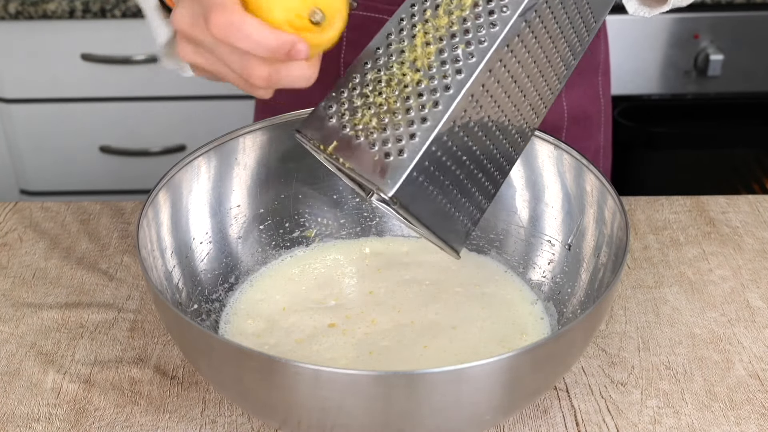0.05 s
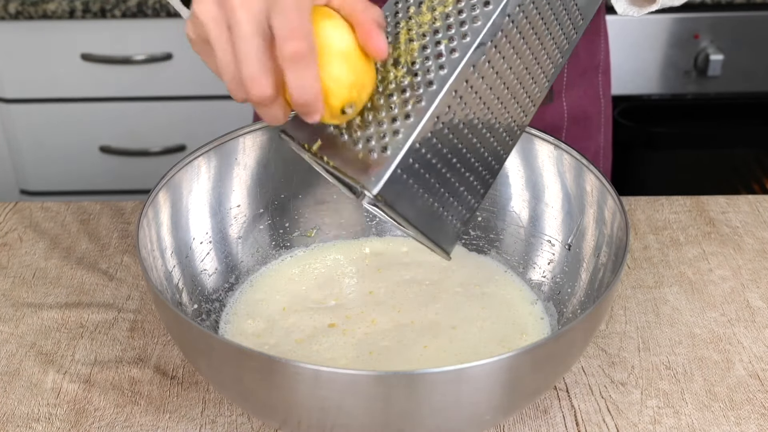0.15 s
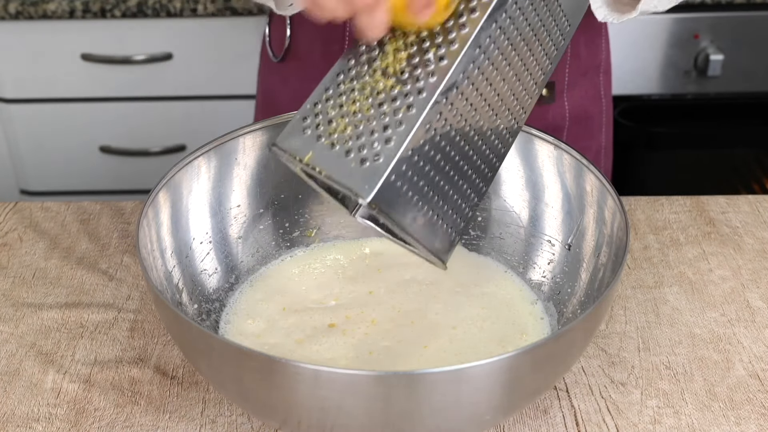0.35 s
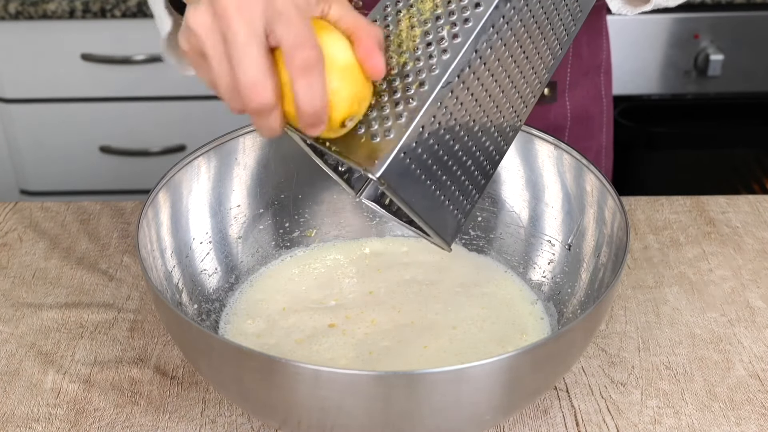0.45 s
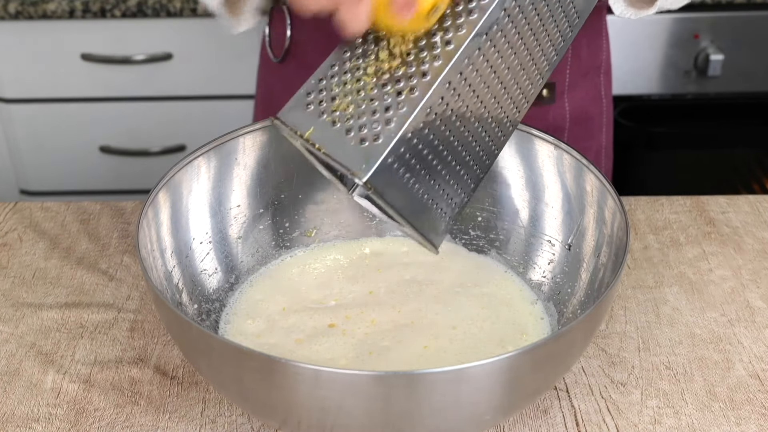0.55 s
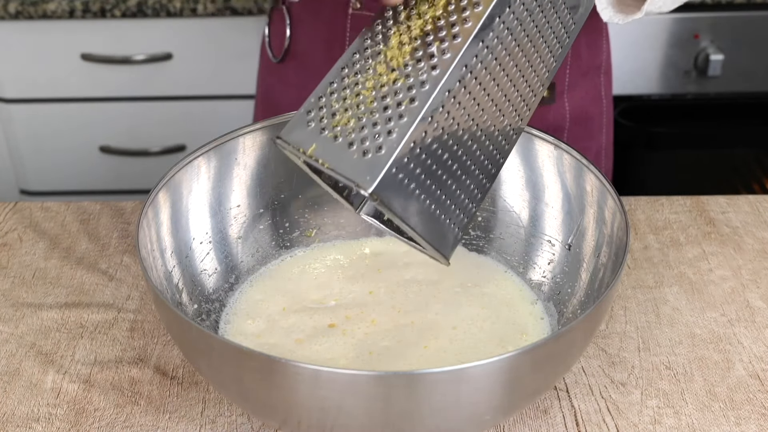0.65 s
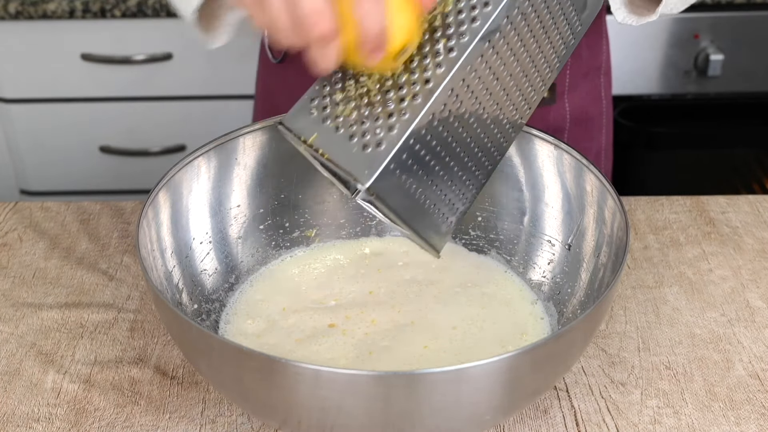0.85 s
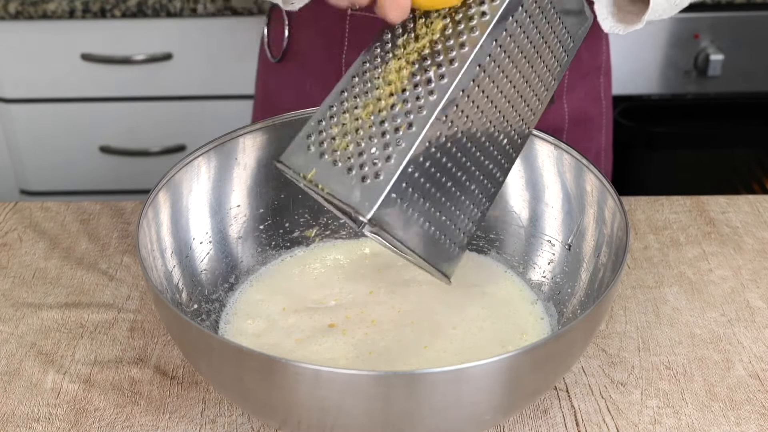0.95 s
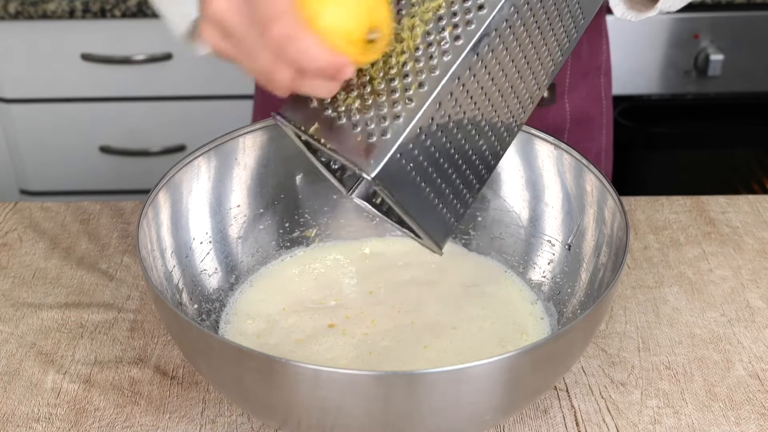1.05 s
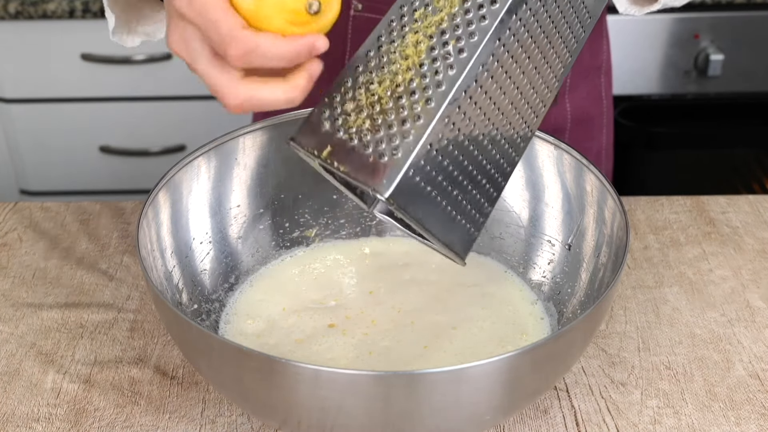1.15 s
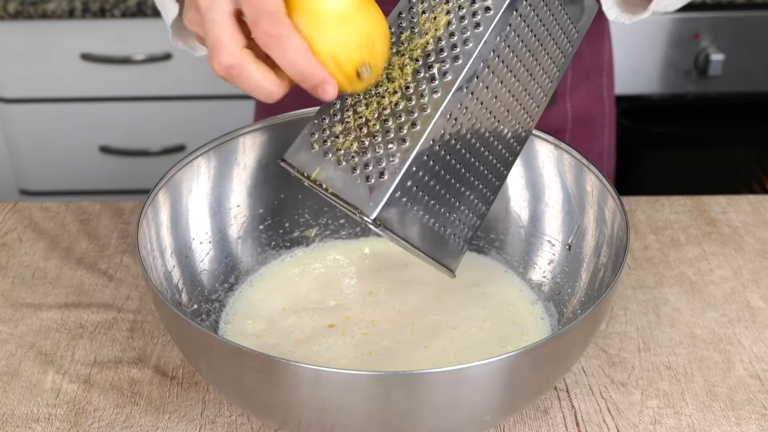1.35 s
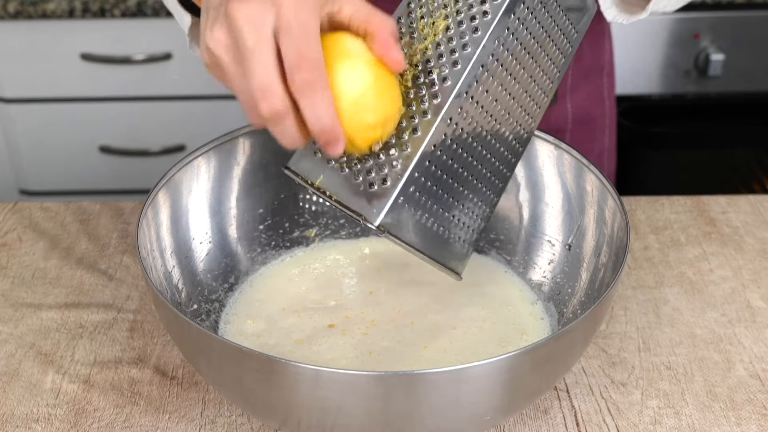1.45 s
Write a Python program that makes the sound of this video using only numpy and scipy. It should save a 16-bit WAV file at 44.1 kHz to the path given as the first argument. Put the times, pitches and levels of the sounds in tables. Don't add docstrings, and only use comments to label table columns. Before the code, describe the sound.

After a brief hush of dull room hum, fruit peel rasps five times in quick succession on a ringing sheet-metal grater, with low table thumps beneath; then soft handling, heard close in a small hard-walled kitchen, left channel only.

```python
import sys
import numpy as np
from scipy import signal
from scipy.fft import rfft, irfft
from scipy.io import wavfile
from scipy.ndimage import uniform_filter1d

SR = 44100
rng = np.random.default_rng(int(sys.argv[2]) if len(sys.argv) > 2 else 0)


def wrap_up_sound(samples):
    columns = np.atleast_2d(samples).T
    tamed = np.clip(columns, -1, 1)
    steps = np.round(tamed * 32767).astype(np.int16)
    wavfile.write(sys.argv[1], SR, steps)


def ratio(d):
    e = np.asarray(d, float) / 20
    return 10 ** e


N = 66150


def evened(x):
    return x / np.sqrt(np.mean(x ** 2) + 1e-20)


def read(points, hz):
    f, value = np.transpose(points)
    return np.interp(np.log(hz + 1), np.log(f + 1), value)


def curve(points):
    return np.interp(np.arange(N) / SR, *np.transpose(points))


def filtered(x, points):
    return irfft(rfft(x) * ratio(read(points, np.fft.rfftfreq(N, 1 / SR))), N)


def coloured(x, points):
    return evened(filtered(x, points))


def wobble(span_s):
    size = max(int(span_s * SR), 2)
    noise = rng.standard_normal(N)
    return evened(uniform_filter1d(uniform_filter1d(noise, size), size))


def patchy(x):
    patch_db = 2.2
    z = signal.stft(x, SR, nperseg=256)[2]
    field = uniform_filter1d(rng.standard_normal(z.shape), size=5, axis=0)
    field = uniform_filter1d(field, size=8, axis=1)
    z = z * ratio(patch_db * evened(field))
    return evened(signal.istft(z, SR, nperseg=256)[1][:N])


def ringing(x, modes, grip_db):
    grip_s = 0.05
    out = np.zeros(N)
    for hz, width, db in modes:
        r = np.exp(-np.pi * width / SR)
        poles = [1, -2 * r * np.cos(2 * np.pi * hz / SR), r * r]
        drive = x * ratio(grip_db * wobble(grip_s))
        out += ratio(db) * (1 - r) * signal.lfilter([1, 0, -1], poles, drive)
    return out


def rubbing():
    # (start [s], fastest [s], end [s], force [dB], extra ring of the open side [dB])
    strokes = [
        (0.23, 0.288, .41, -19.5, -8),
        (0.376, 0.452, 0.54, -17.5, -4),
        (0.525, 0.612, 0.7, -17, -12),
        (0.681, 0.783, 0.8725, -18.5, -1),
        (0.852, 0.907, 1.0393, -16.5, -0.5),
        (1.454, 1.465, 1.52, -33.5, 14),
    ]
    # (start [s], level [dB], rub length [s], fade [dB/s], extra weight on the bowl [dB])
    touches = [
        (0.207, -36.5, 0.055, 282, -27),
        (0.269, -24.5, 0.0042, 488, -14),
        (1.017, -34, 0.012, 168.5, 3),
        (1.1, -30.5, 0.01, 529, 11),
    ]
    rise_power, fall_power, touch_rise_s = 0.99, 1.445, 0.0059
    t = np.arange(N) / SR
    out = np.zeros((3, N))
    for start, top, end, db, free_db in strokes:
        up = np.clip((t - start) / (top - start), 0, 1)
        down = np.clip((end - t) / (end - top), 0, 1)
        arch = np.sin(np.pi / 2 * up) ** rise_power * np.sin(np.pi / 2 * down) ** fall_power
        out += ratio(db + np.array([[0], [0], [free_db]])) * arch
    for start, db, length, fade_db_per_s, weight_db in touches:
        rise = np.clip((t - start) / touch_rise_s, 0, 1)
        fade = ratio(-fade_db_per_s * np.maximum(t - start - length, 0))
        out += ratio(db + np.array([[0], [weight_db], [0]])) * rise * fade
    return out


def tearing():
    tears_per_s, spread_db = 9000, 1
    flicker_db, flicker_s = 0.5, 0.0022
    size = ratio(spread_db * np.minimum(rng.exponential(1, N), 4)) * rng.choice([-1., 1.], N)
    tears = evened(size * (rng.random(N) < tears_per_s / SR))
    return patchy(tears * ratio(flicker_db * wobble(flicker_s)))


def grater():
    # (frequency [Hz], density [dB per Hz])
    peel_colour = [(120, -31.5), (200, -36.5), (392, 5), (437, -14), (755, -12), (1380, -6.5), (4020, -4),
                   (8320, -1.5), (15400, -12.5)]
    # (frequency [Hz], width [Hz], level [dB])
    panels = [(1290, 320, 3.5), (1697, 83, 4.5), (2042, 86, -4), (2576, 110, 7.5), (2875, 95, 5),
              (3780, 89, -14)]
    # (frequency [Hz], width [Hz], level [dB])
    rims = [(4975, 300, 4), (6060, 40, -0.5), (6010, 220, 0), (6380, 440, -6.5), (9000, 45, -2),
            (8430, 170, 0.5), (9750, 25, 4)]
    # (frequency [Hz], width [Hz], level [dB])
    rings = [(1315, 9.9, 4), (1903, 41, 3), (1991, 28, -5), (2143, 38, 3), (2280, 11, -5),
             (2797, 6.7, -8.5), (2820, 4.7, -1), (2850, 12, -7), (2940, 12, 4), (5605, 35, 2.5)]
    # (frequency [Hz], width [Hz], level [dB])
    long_rings = [(1063, 6, 0), (1105, 9, -5), (1405, 7, -3), (1508, 10, -5)]
    # (frequency [Hz], width [Hz], level [dB])
    bowl = [(314.6, 37, -2.5), (405, 17, -1), (497, 32, 1), (656.8, 16, 6), (910, 85, -16)]
    peel_db, grip_db = -2, 2.5
    sizzle_hz, sizzle_power = 11000, 0.5
    force, weight, free = rubbing()
    tears = tearing()
    peel = coloured(tears, peel_colour)
    top = signal.filtfilt(*signal.butter(2, sizzle_hz, "high", fs=SR), peel)
    lost = 1 - (force / force.max()) ** sizzle_power
    out = ratio(peel_db) * force * (peel - lost * top)
    for modes, db, drive in ((panels, -13, force), (rims, -17, force), (rings, -12, force),
                             (long_rings, -16, free), (bowl, -17, weight)):
        scale = np.sqrt(sum(ratio(2 * level) * width for hz, width, level in modes) * np.pi / SR)
        out += ratio(db) * ringing(tears * drive, modes, grip_db) / scale
    return out


def tick():
    # (frequency [Hz], width [Hz], level [dB])
    struck = [(2300, 200, 0.52), (2630, 150, 1.5), (3180, 130, 0.23)]
    start_s, level_db, fade_db_per_s = 0.204, -33, 450
    t = np.arange(N) / SR - start_s
    burst = (t > 0) * ratio(-fade_db_per_s * np.maximum(t, 0)) * rng.standard_normal(N)
    ring = ringing(burst, struck, grip_db=0)
    return ratio(level_db) * ring / abs(ring).max()


def table():
    # (time [s], level [dB])
    shake = [(0.25, -62.5), (0.494, -33.5), (0.626, -38), (0.702, -74), (0.75, -53), (0.86, -64.5),
             (0.896, -48.5), (1.026, -71.5), (1.06, -86.5)]
    # (frequency [Hz], density [dB per Hz])
    shake_tone = [(15, -38.5), (25, -26.5), (75, 1), (146, -2), (231, -11.5), (257, -21), (300, 0.5),
                  (390, -24), (660, -120)]
    t = np.arange(N) / SR
    on = (t > shake[0][0]) & (t < shake[-1][0])
    return 2 * on * ratio(curve(shake)) * coloured(rng.standard_normal(N), shake_tone)


def fingers():
    # (time [s], level [dB])
    rustle_level = [(1.2, -60.5), (1.3, -6.5), (1.4, -10.5), (1.45, -2)]
    rustle = ringing(rng.standard_normal(N), [(1250, 500, 0)], grip_db=0)
    return ratio(-64.5 + curve(rustle_level)) * evened(rustle)


def kitchen(x):
    # (frequency [Hz], time [s])
    decay = [(300, .14), (1500, .2), (5000, .12), (12000, .07)]
    taps = np.zeros(SR // 2)
    at = np.arange(200, len(taps) - 20, 20)
    taps[at + rng.integers(0, 20, len(at))] = rng.choice([-1., 1.], len(at))
    hz, t, z = signal.stft(taps, SR, nperseg=256)
    z = z * ratio(-60 * t / read(decay, hz)[:, None])
    tail = signal.istft(z, SR, nperseg=256)[1]
    return signal.fftconvolve(x, tail / np.linalg.norm(tail))[:N]


def room_tone():
    # (frequency [Hz], density [dB per Hz])
    dull = [(30, -49), (177, -9), (220, -15), (390, -3), (560, -6.5), (800, -17.5), (1100, -30.5),
            (3000, -63.5)]
    # (frequency [Hz], density [dB per Hz])
    bright = [(900, -19), (1500, 2.5), (4400, -5.5), (4900, 2), (5500, -7.5), (8400, -5), (11000, -6.5),
              (15000, -19)]
    # (time [s], gain [dB])
    duck = [(0, -1), (.25, 4), (1.0, -17.5), (1.2, -1.5), (1.5, -6.5)]
    lump_db, lump_s = 2, 0.02
    hum_hz, hum_waver_hz = 291, 3.06
    air = ratio(-48 + lump_db * wobble(lump_s)) * coloured(rng.standard_normal(N), dull)
    turns = np.cumsum(hum_hz + hum_waver_hz * wobble(0.03)) / SR
    hum = ratio(-48 + 2.5 * wobble(0.0303)) * np.sin(2 * np.pi * turns)
    hiss = ratio(-69.5) * coloured(rng.standard_normal(N), bright)
    return ratio(curve(duck)) * (air + hum) + hiss


def right_hiss():
    # (frequency [Hz], density [dB per Hz])
    hiss_colour = [(80, -15), (200, 2), (2500, -2), (8500, 1), (13000, -3), (14200, -12), (14400, -60)]
    return ratio(-91) * coloured(rng.standard_normal(N), hiss_colour)


def scene():
    wet_db = -9
    steel = grater() + tick()
    left = steel + ratio(wet_db) * kitchen(steel) + table() + room_tone() + fingers()
    return np.array([left, right_hiss()])


def microphone(x):
    # (frequency [Hz], gain [dB])
    roll_off = [(9000, -0.5), (12000, -2), (15000, -8.5)]
    return filtered(x, roll_off)


def sparse_treble(x):
    # (frequency [Hz], level [dB])
    bar_level = [(9000, -64.5), (11000, -49.5), (13000, -46.5), (15500, -47)]
    follow, waver_db = 0.95, 9.0
    hz, t, z = signal.stft(x, SR, nperseg=1024)
    power = abs(z[:512]) ** 2
    chance = uniform_filter1d(rng.standard_normal((128, len(t))), size=5, axis=1)
    waver = np.repeat(ratio(waver_db * chance), 4, axis=0)
    bar = ratio(2 * read(bar_level, hz[:512]))[:, None] * waver * power.sum(0) ** follow
    z[:512] *= power > bar * (hz[:512, None] > bar_level[0][0])
    return signal.istft(z, SR, nperseg=1024)[1][:N]


def low_pass(x):
    return signal.sosfilt(signal.butter(12, 15600, fs=SR, output="sos"), x)


def record(dry):
    left = sparse_treble(microphone(dry[0]))
    return low_pass(np.array([left, dry[1]]))


dry = scene()
out = record(dry)
wrap_up_sound(out)
```